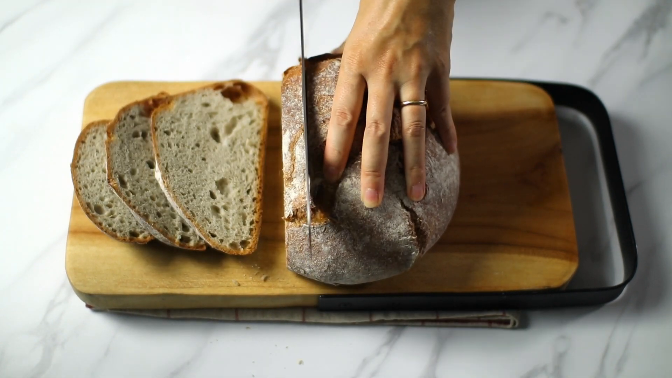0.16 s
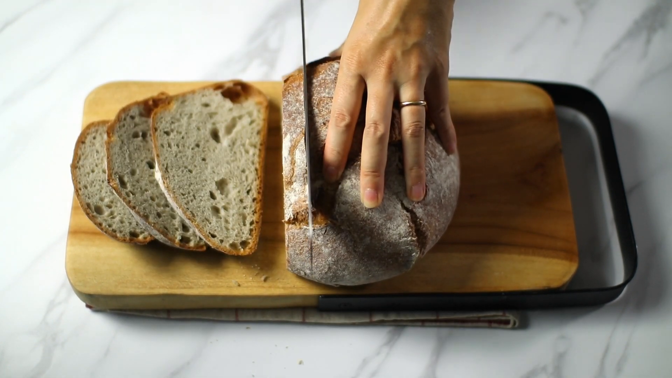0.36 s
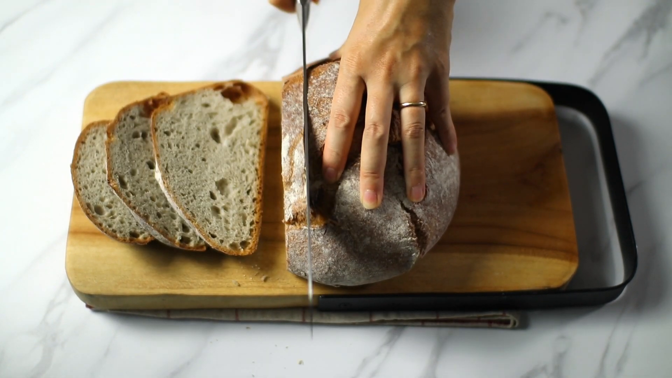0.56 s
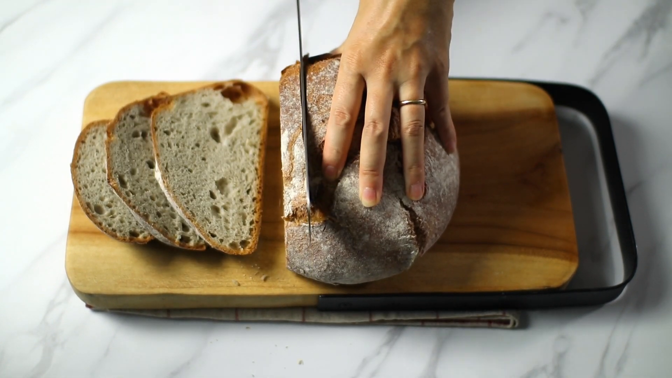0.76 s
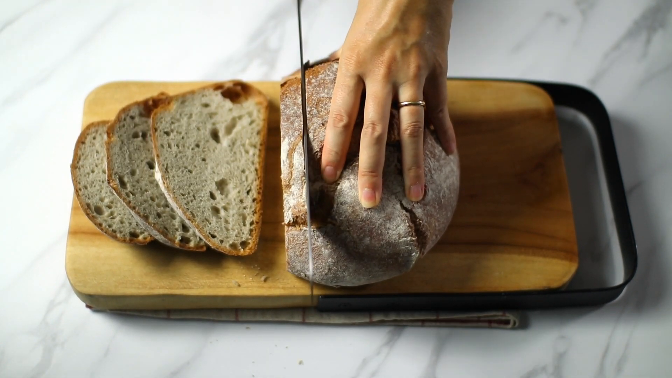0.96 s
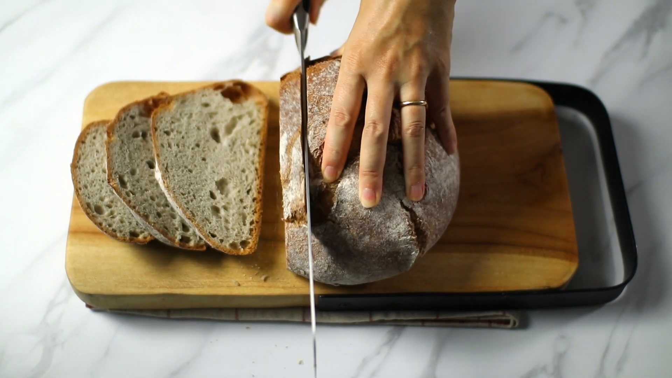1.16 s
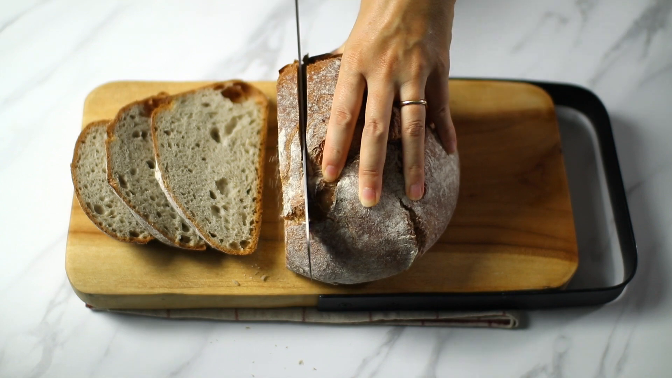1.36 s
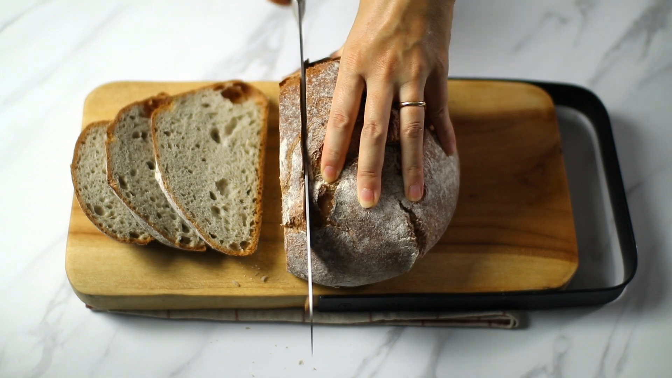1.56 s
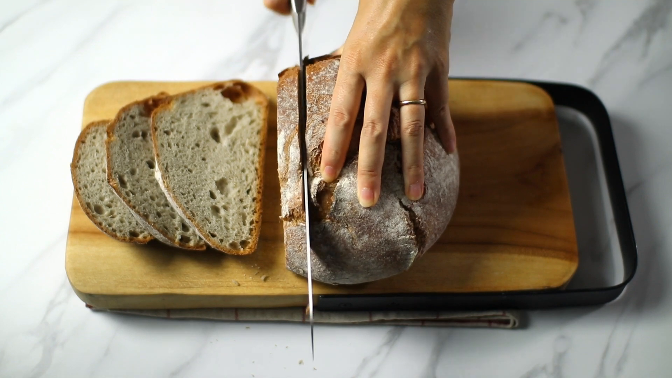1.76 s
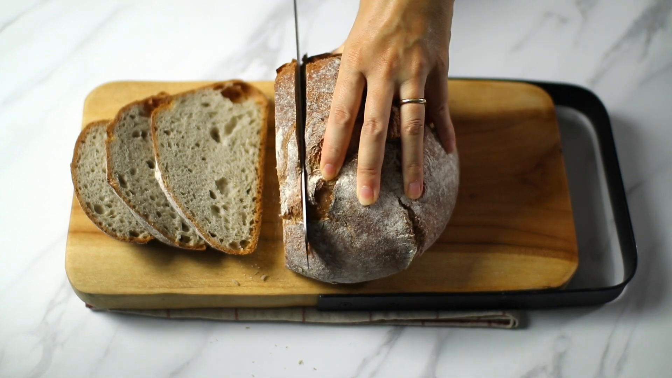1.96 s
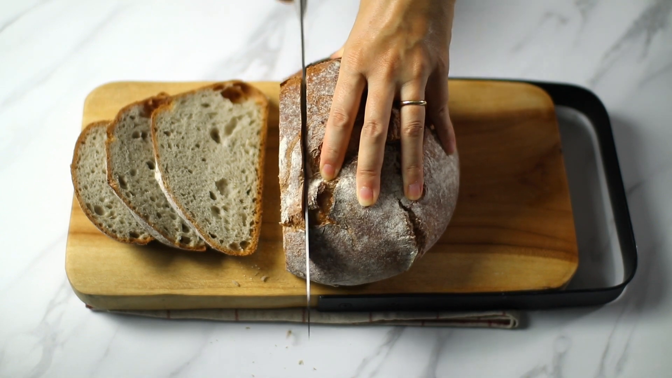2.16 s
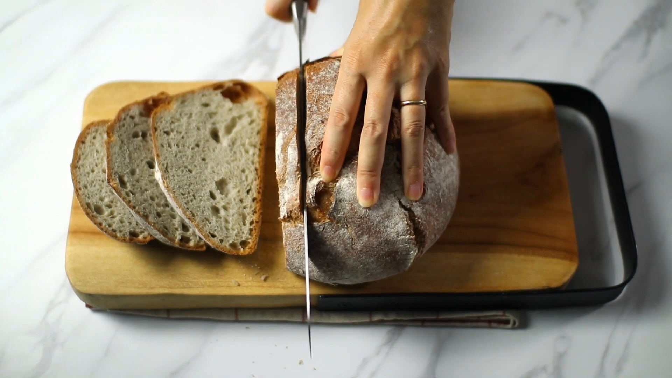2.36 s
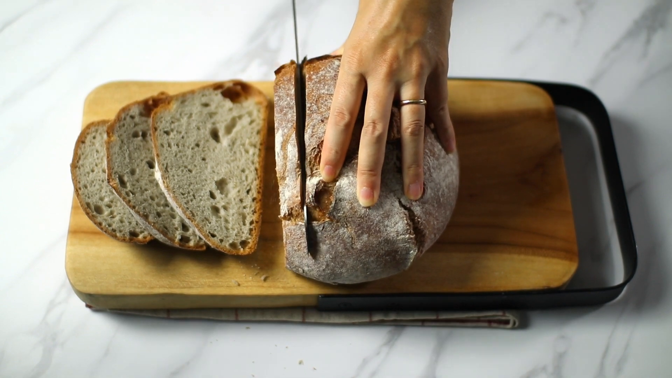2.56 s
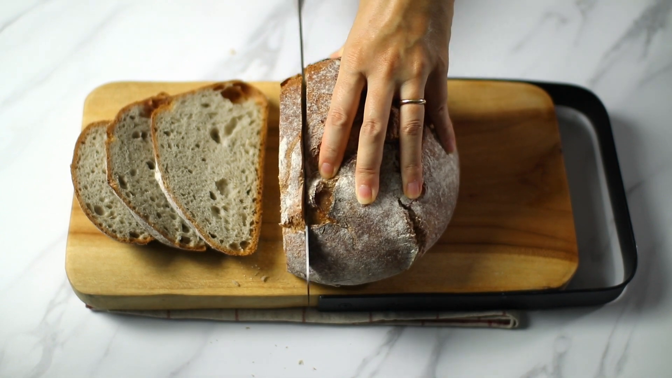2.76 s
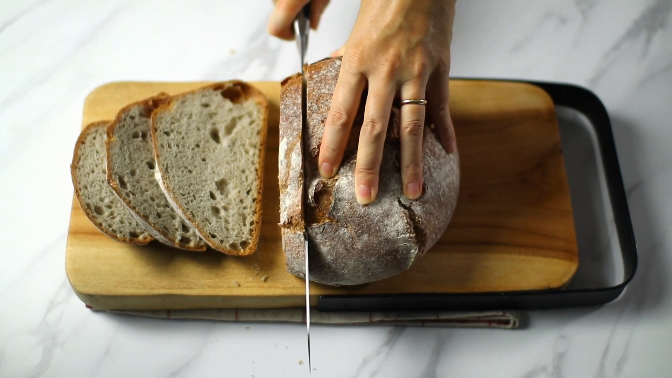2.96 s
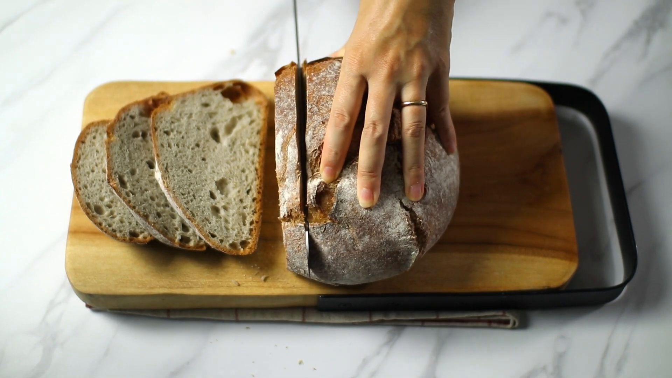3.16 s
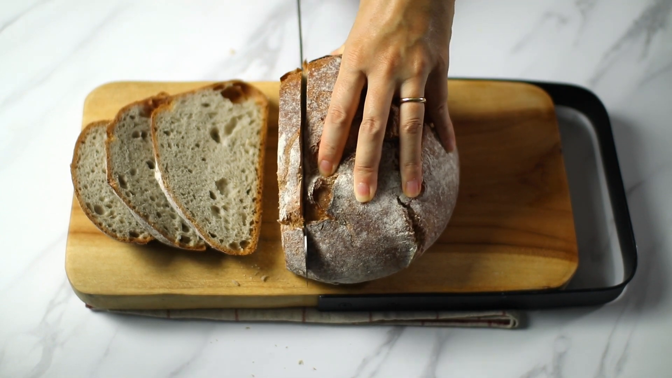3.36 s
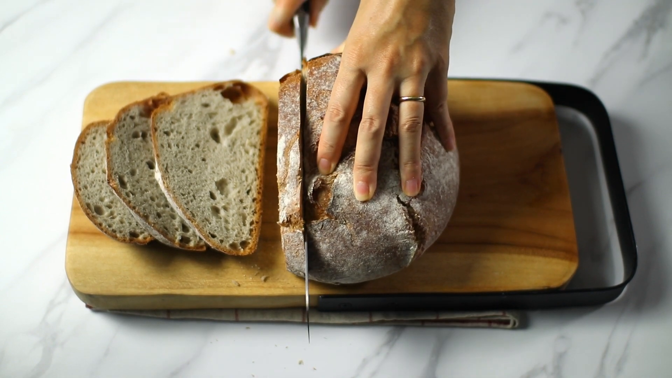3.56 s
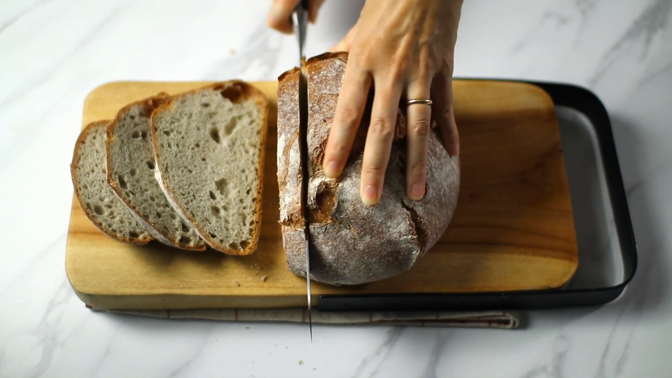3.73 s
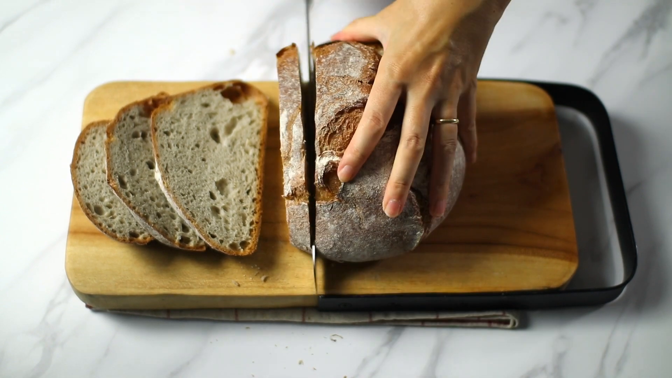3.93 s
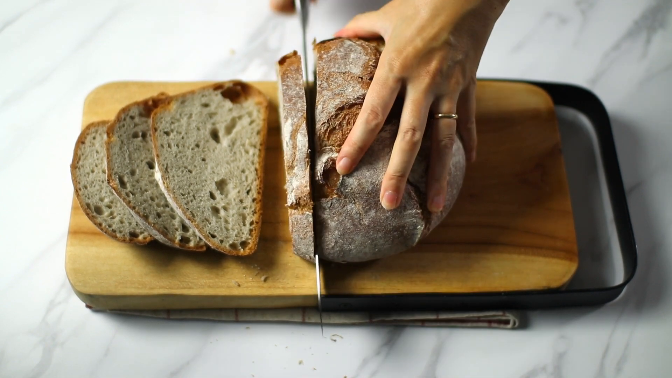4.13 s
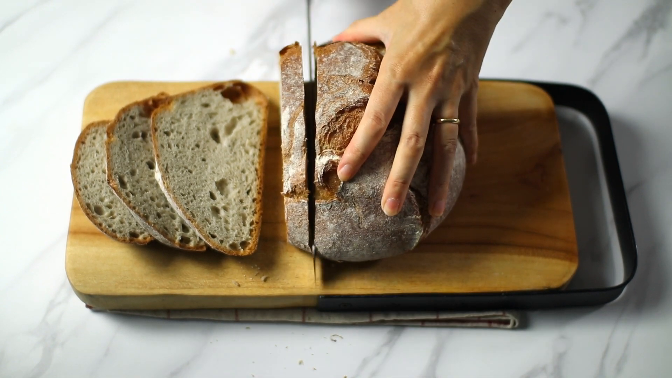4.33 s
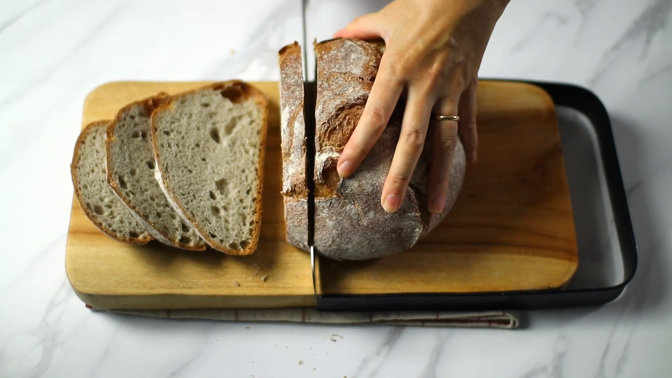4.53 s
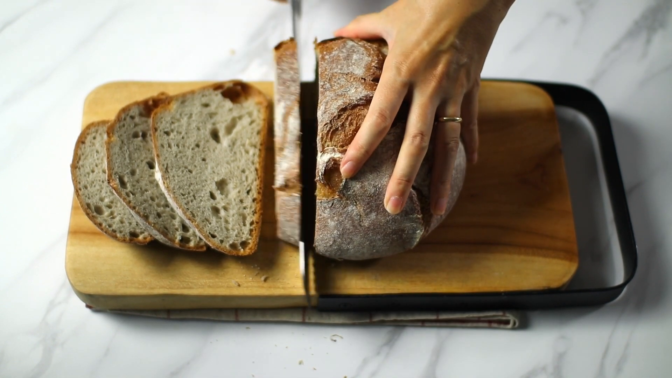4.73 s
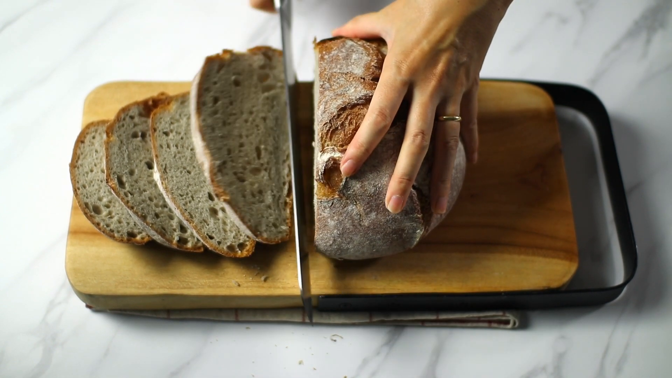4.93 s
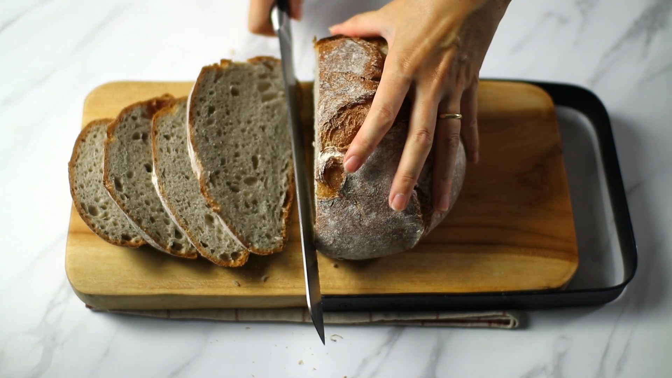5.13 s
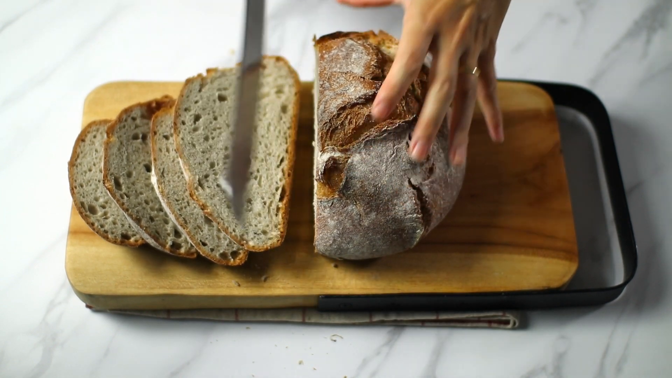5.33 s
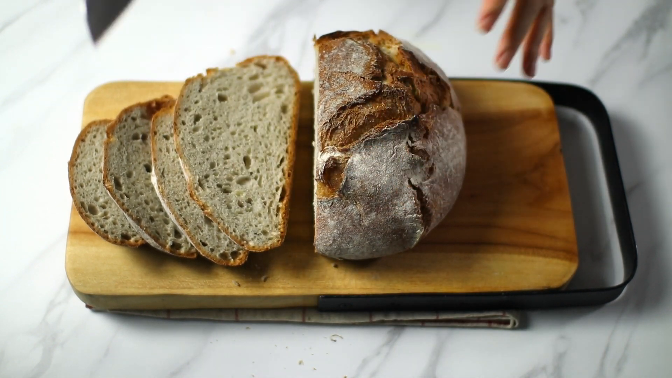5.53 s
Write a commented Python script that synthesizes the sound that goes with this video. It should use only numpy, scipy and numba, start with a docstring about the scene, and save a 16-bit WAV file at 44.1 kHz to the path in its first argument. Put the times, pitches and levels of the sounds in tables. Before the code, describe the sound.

Close, gritty bread sawing with crackling crust and low groans, then teeth rasping on wood and a soft flop in a quiet kitchen.

```python
"""Sawing a crusty loaf

A serrated knife saws a crusty loaf on a wooden board, heard from close by in a quiet kitchen.
Twelve strokes shatter the crust into noise grains and make the loaf shudder and groan by stick-slip;
then the teeth rasp over the board and excite its modes, the blade slides out along the crumb in soft
grains and the slice flops onto the others as damped sines. The steel blade rings along as a modal filter."""
import sys
import numpy as np
from scipy import signal
from scipy.fft import rfft, irfft
from scipy.io import wavfile
from scipy.ndimage import uniform_filter1d
from numba import njit

SR = 44100
rng = np.random.default_rng(int(sys.argv[2]) if len(sys.argv) > 2 else 0)


def transcribe(u):
    """Save the signal u as a 16-bit wav file named by the first command-line argument.

    u: samples, shape (n,) or (channels, n), limited to [-1, 1]; the rate is SR.
    q: integer samples, one column per channel.
    """
    v = np.clip(np.atleast_2d(u).T, -1, 1)
    q = np.round(v * 32767).astype(np.int16)
    wavfile.write(sys.argv[1], SR, q)


N = 246519
T = np.arange(N) / SR
DEEPENS_S = 1.77  # time over which the cut reaches its full depth


def undb(db):
    """Decibel law: level to amplitude gain."""
    return 10 ** (np.asarray(db) / 20)


def unit(x):
    """Normalisation to an rms of 1."""
    return x / np.sqrt(np.mean(x ** 2))


def controls(rows):
    """Linear interpolation: the columns of a curve table, sample by sample."""
    s, *columns = np.transpose(rows)
    return [np.interp(T, np.sort(s), c) for c in columns]


def band(x, lo_hz, hi_hz, order=2):
    """Band-pass filtering (Butterworth)."""
    edges = [lo_hz, min(hi_hz, .45 * SR)]
    return signal.sosfilt(signal.butter(order, edges, "band", fs=SR, output="sos"), x)


def convolve(x, response):
    """Linear superposition: every sample of x launches the impulse response."""
    return signal.fftconvolve(x, response)[:len(x)]


def colour(x, points):
    """Minimum-phase filtering: a causal response with the given (frequency [Hz], level [dB]) curve."""
    hz, db = np.transpose(points)
    log_hz = np.log(np.fft.rfftfreq(8192, 1 / SR) + 1)
    log_gain = np.log(undb(np.interp(log_hz, np.log(hz), db)))
    cepstrum = irfft(log_gain)
    half = len(cepstrum) // 2
    # folding the cepstrum onto positive time makes the response causal
    folded = np.r_[cepstrum[0], 2 * cepstrum[1:half], np.zeros(half)]
    return convolve(x, irfft(np.exp(rfft(folded))))


def fade(t60):
    """Exponential damping: a decay of 60 dB in t60 seconds."""
    return np.exp(-np.log(1000) * T[:SR // 2] / t60)


def burst(t60):
    """Damped noise: a dying puff with energy 1."""
    puff = rng.standard_normal(SR // 2) * fade(t60)
    return puff / np.linalg.norm(puff)


def ring(modes):
    """Modal superposition: impulse response of (frequency [Hz], level [dB], t60 [s]) modes, energy 1."""
    out = np.zeros(SR // 2)
    for k, (hz, db, t60) in enumerate(modes):
        sign = (-1) ** k
        out += sign * undb(db) * fade(t60) * np.sin(2 * np.pi * hz * T[:SR // 2])
    return out / np.linalg.norm(out)


def add(out, s, sound):
    """Superposition: mix a sound in at time s."""
    i = int(s * SR)
    out[i:i + len(sound)] += sound[:N - i]


def walk(rate):
    """Smoothed random modulation: chance with an rms of 1 and about rate new values per second."""
    k = max(int(SR / rate), 2)
    return unit(uniform_filter1d(rng.standard_normal(N)[np.arange(N) // k], k))


def clicks(rate, spread_db):
    """Poisson impulses: random clicks, many small and a few large."""
    size = undb(spread_db * np.minimum(rng.exponential(size=N), 4.5))
    return unit((rng.random(N) < rate / SR) * size * rng.choice([-1, 1], N))


def teeth(rate, jitter, spread_db):
    """Jittered impulse train: serrations catch and let go one after another, unevenly."""
    gaps, sizes = rng.standard_normal((6000, 2)).T
    at = (np.cumsum(np.exp(jitter * gaps)) * SR / rate).astype(int)
    inside = at < N
    return unit(np.bincount(at[inside], undb(spread_db * sizes[inside]), N))


def even(x, seconds):
    """Level regulation: hold the short-term rms near 1, as the hand keeps its force."""
    return x / np.sqrt(uniform_filter1d(x ** 2, int(seconds * SR)) + 1e-9)


@njit
def resonate(x, hz, width):
    """Time-varying resonance: a state-variable band-pass with a moving centre."""
    y, b, l = np.empty(len(x)), 0., 0.
    for i in range(len(x)):
        g, k = np.tan(np.pi * hz[i] / SR), width / hz[i]
        v = (b + g * (x[i] - l)) / (1 + g * (g + k))
        b, l, y[i] = 2 * v - b, l + 2 * g * v, k * v
    return y


def voiced(x, lo_hz, hi_hz):
    """Zero-phase band splitting: low, middle and high parts of rms 1 that stay in phase."""
    low = signal.sosfiltfilt(signal.butter(3, lo_hz, fs=SR, output="sos"), x)
    below = signal.sosfiltfilt(signal.butter(3, hi_hz, fs=SR, output="sos"), x)
    return unit(low), unit(below - low), unit(x - below)


def fractures(rate, spread_db, t60, count=6):
    """Brittle fracture: tiny breaks in several flakes, each flake with its own brief rattle."""
    return unit(sum(convolve(clicks(rate / count, spread_db), burst(t60)) for _ in range(count)))


def scatter(x):
    """Sign randomisation: the same jolts, each pushing a different way."""
    return x * rng.choice([-1, 1], N)


def swing(s, length, power=1, growth_db=0):
    """Half-sine kinematics: one swing of the arm, with pressure growing steadily along it."""
    way = np.clip((T - s) / length, 0, 1)
    return np.abs(np.sin(np.pi * way)) ** power * undb(growth_db * (way - .5))


def held(s, length, attack, t60):
    """Contact envelope: linear attack, hold, and a decay of 60 dB in t60 seconds."""
    release = np.maximum(T - s - length, 0)
    return np.clip((T - s) / attack, 0, 1) * np.exp(-np.log(1000) * release / t60)


# saw strokes: (time [s], length [s], growth of pressure from start to end [dB], crunch [dB], fizz [dB],
#   bite into the crust [dB], loaf shake [dB], sway in that shake [dB], board rocking [dB],
#   crust shell [dB], hollow of the cut [Hz], hollow [dB])
STROKES = [ (0.065, 0.2, -4.5, -37, -41, -36.5, -37, 1.5, -33, -4, 630, -0.5),
           (0.316, 0.21, 0.5, -38.5, -44, -37, -31, -0.5, -37.5, 0, 620, -4),
           (0.624, 0.18, 0.5, -43, -45.5, -40.5, -37.5, 2, -39.5, 0, 600, -6),
           (0.858, 0.278, 10.5, -36, -45.5, -37.5, -32, -3, -34, 1.5, 570, -9),
           (1.197, 0.22, 0, -42, -46, -37, -34.5, 2.5, -37.5, -2, 497, 3),
           (1.457, 0.23, 3, -41, -50.5, -36, -33, -7, -37.5, -4, 467, 0),
           (1.763, 0.22, 7, -42, -49, -37, -36, -1.5, -37, -4, 405, 1.5),
           (2.039, 0.270, 9.5, -39, -49, -37.5, -33.5, -4, -41.5, -16, 462, -1.5),
           (2.396, 0.21, 0.5, -41.5, -48.5, -40, -40, 1, -39, -24, 600, -27),
           (2.623, 0.34, 15.5, -37.5, -47.5, -37, -34.5, -1.5, -38.5, -17, 586, -18),
           (3.056, 0.2, 7, -40.5, -47, -39.5, -44.5, -0.5, -46, -5, 1034, 1.5),
           (3.327, 0.27, 0.5, -38, -49.5, -36.5, -36, -1.5, -38, -26, 1250, -19)]
# between strokes the blade turns round in the loaf, until it is through;
# the turns get quieter as it sinks into soft crumb
REST_SINKS_DB_PER_S = -1.7
THROUGH_S, THROUGH_T60_S = 3.595, 0.68


def stroked(stroke_db, law, rest_db):
    """Energy summation: gain of one layer over all strokes, never quite still while the blade is in the loaf."""
    power, extra_db, overhang, lag = law
    after = np.maximum(T - THROUGH_S, 0)
    energy = undb(rest_db + REST_SINKS_DB_PER_S * T - 60 * after / THROUGH_T60_S) ** 2
    for (s, length, growth_db, *_), db in zip(STROKES, stroke_db):
        arm = swing(s + lag - overhang, length + 2 * overhang, power, growth_db + extra_db)
        energy += (undb(db) * arm) ** 2
    return np.sqrt(energy)


# the hand leans on the loaf to finish the cut:
# (time [s], length [s], board rocking [dB], loaf shake [dB])
LEANS = [(3.781, 0.073, -46, -66), (3.889, 0.13, -30.5, -45.5), (4.0, .09, -43, -62),
         (4.075, 0.17, -30, -45), (4.163, .42, -42.5, -41), (4.84, .08, -61.5, -81)]


def leaned(column, power=1):
    """Amplitude summation: gain of one LEANS level column over all leans."""
    return sum(undb(row[column]) * swing(row[0], row[1], power) for row in LEANS)


# spectrum of the kitchen's hush: (frequency [Hz], relative level [dB])
KITCHEN = [(15, -33), (25, 9), (126, -35), (691, -36.5), (857, -27), (1040, -26.5), (1470, -21.5),
           (2810, -26), (3490, -24), (4330, -27.5), (13400, -39.5), (15800, -51)]
KITCHEN_DB = -64.5


def kitchen_hush():
    """Stationary coloured noise: the room's steady background."""
    return undb(KITCHEN_DB) * unit(colour(rng.standard_normal(N), KITCHEN))


def kitchen_echo(close):
    """Diffuse reverberation: a delayed, decaying noise tail as the room's impulse response."""
    tail = np.r_[np.zeros(SR // 150), burst(t60=.33)]
    return undb(-15) * convolve(band(close, 320, 7300, order=2), tail)


# rumble of board and tray: (frequency [Hz], relative level [dB])
TRAY = [(20, -2), (35, -23.5), (55, 8.5), (75, 0.5), (105, -7.5), (140, -18), (200, -55)]
# laws: (power of the speed, extra growth over the stroke [dB], overhang at both ends [s], lag [s])
ROCK_LAW, REST_ROCK_DB = (1.5, -11.5, 0.0352, 0.09), -51.5


def rocking():
    """Forced low-frequency vibration: board and tray rumble on the cloth under the arm's push."""
    *_, rock_db, _, _, _ = np.transpose(STROKES)
    push = stroked(rock_db, ROCK_LAW, REST_ROCK_DB) + leaned(column=2, power=1.5)
    return push * even(colour(rng.standard_normal(N), TRAY), seconds=0.077)


# the slice lands: (time [s], level before contact and decay [dB], frequency [Hz], t60 [s])
FLOP = [(5.2303, -38.5, 71, 0.061), (5.2368, -28.5, 708, 0.016), (5.242, -28.5, 54.4, 0.14)]


def flop():
    """Soft impact of damped oscillators: the slice taps its neighbour, thuds and sheds a few crumbs."""
    out, t = np.zeros(N), T[:SR // 2]
    for s, db, hz, t60 in FLOP:
        soft_contact = 1 - np.exp(-5 * hz * t)
        add(out, s, -undb(db) * soft_contact * fade(t60) * np.sin(2 * np.pi * hz * t))
    crumbs = band(burst(t60=0.072), 550, 2900, order=2)
    add(out, 5.243, undb(-15) * crumbs)
    return out


# spectrum of the crumb grains: (frequency [Hz], relative level [dB])
CRUMB = [(200, -18), (380, -12), (560, -2), (1100, 3), (1600, -1.5), (2500, 0), (3600, -7), (5000, -13.5),
         (8000, -20.5), (11700, -30), (15800, -38)]
# the blade's flat rubs the crumb: (time [s], length [s], level [dB], brightness [dB])
RUBS = [(3.735, 0.083, -54.5, -1.5), (3.837, 0.068, -43, -14), (3.907, 0.09, -41, -14.5),
        (4.032, .072, -42.5, -12), (4.222, 0.059, -39, -15), (4.71, 0.061, -45, -16.5),
        (4.792, 0.099, -53.5, -21), (4.912, 0.37, -65, -10), (5.058, 0.077, -54.5, -20)]
RUB_ATTACK_S, RUB_T60_S = 0.017, 0.11


def rubbing():
    """Granular friction: the flat of the blade brushes crumb and loose grit in fine, soft grains."""
    grains = colour(fractures(rate=8200, spread_db=2.5, t60=0.0071), CRUMB)
    low, middle, high = voiced(band(grains, 430, 17000, order=3), lo_hz=950, hi_hz=6500)
    out = np.zeros(N)
    for s, length, db, bright_db in RUBS:
        grain = undb(-7.5) * low + middle + undb(bright_db) * high
        out += held(s, length, RUB_ATTACK_S, RUB_T60_S) * undb(db) * grain
    return out


# modes of the wooden board: (frequency [Hz], relative level [dB], t60 [s])
BOARD = [(239, -3.5, 0.042), (282, -7, 0.067), (327, -12, 0.048), (435, -5.5, 0.076), (497, -6.5, 0.082),
         (567, -4.5, 0.051), (840, -13.5, 0.094), (970, -6, 0.075), (1021, -0.5, 0.056), (1085, 3, 0.1),
         (1158, 0, 0.085), (1230, -3.5, 0.037), (1414, -5.5, 0.13), (1466, -5.5, 0.043), (1607, -14, .07),
         (1795, -17.5, 0.082), (1870, -15, 0.036), (2080, -17.5, 0.097), (2254, -11, 0.084),
         (2424, -16.5, 0.056), (2925, -22, 0.034), (3440, -24, 0.0487)]
# spectrum of the grit: (frequency [Hz], relative level [dB])
RASP = [(700, -17), (1500, 2), (2300, -7), (2750, -7.5), (3600, -4.5), (4000, -14), (4400, -10.5),
        (5600, -19.5), (7000, -18.5), (8500, -26.5), (11800, -23.5), (13300, -20), (15500, -31)]
# the teeth drag over the board:
# (time [s], length [s], attack [s], level [dB], brightness [dB], pressure on the wood [dB])
SCRAPES = [(4.112, 0.055, .007, -26.5, -8.5, -10), (4.29, 0.1, .035, -22, -7.5, -10),
           (4.395, 0.0076, 0.0091, -30, -19.5, 2.5), (4.457, 0.03, .02, -39, -7, 1.5),
           (4.49, 0.1, 0.0048, -28, -12, -11), (4.664, 0.04, 0.016, -43.5, -10.5, -8.5)]
SCRAPE_T60_S, THRUM_T60_S = .16, 0.28
# single teeth bite into the wood: (time [s], force as peak level [dB])
BITES = [(4.121, -21), (4.134, -14.5), (4.149, -18), (4.171, -17.5), (4.295, -22), (4.337, -14),
         (4.379, -14.5), (4.4, -13), (4.496, -21.5)]


def scraping():
    """Modal excitation by friction: teeth stutter over the wood and ring the board; grit rasps under them."""
    slips = teeth(rate=190, jitter=.5, spread_db=1.5) + undb(-1) * clicks(rate=2500, spread_db=1.5)
    # the board's crowded weaker modes fill in between the strong ones
    board = ring(BOARD) + undb(0.5) * band(burst(t60=0.037), 300, 1750)
    wood, tone, _ = voiced(convolve(slips, board), lo_hz=720, hi_hz=5900)
    agitation = 1 + unit(convolve(np.abs(slips), fade(t60=0.016)))
    grit = fractures(rate=6000, spread_db=2.5, t60=0.0076) * agitation
    rasp = even(colour(grit, RASP), seconds=0.035)
    thrum = even(wood + undb(-8.0) * unit(band(slips, 110, 500)), seconds=0.065)
    tone = even(tone, seconds=0.041)
    out = np.zeros(N)
    for s, length, attack, db, bright_db, pressure_db in SCRAPES:
        out += undb(db) * held(s, length, attack, SCRAPE_T60_S) * (tone + undb(bright_db) * rasp)
        out += undb(db + pressure_db) * held(s, length, attack, THRUM_T60_S) * thrum
    for s, force_db in BITES:
        knock = convolve(burst(t60=0.0044), board) * fade(t60=0.11)
        add(out, s, undb(force_db) * knock / np.abs(knock).max())
    return out


# modes of the steel blade: (frequency [Hz], relative level [dB], t60 [s])
BLADE = [(2740, -2.5, 0.37), (3430, -7.5, .12), (3770, -8, .08), (4310, -2.5, 0.13), (4620, -7, .06),
         (5200, -7, 0.061), (6420, -3.5, 0.055), (6980, 1.5, 0.051), (7840, -5, 0.15), (8780, -4, .07),
         (9830, -9, 0.13), (10740, -6, 0.045), (11500, -1.5, .05), (11780, -10, .11), (13000, -6.5, 0.076),
         (13850, -10.5, .09), (14280, -9.5, .09), (14900, -15.5, .06)]


def steel(contact):
    """Modal resonance: the blade rings on after the treble of whatever its teeth touch."""
    return convolve(scatter(band(contact, 2600, 13000)), ring(BLADE))


BLADE_DB = (-13, -18.5)  # gain of the ringing: at first, buried in the loaf


def blade_ringing(bread, wood):
    """Contact damping: the loaf damps the blade; free of it, on hard wood, the steel rings more."""
    buried = undb(np.interp(T, [0, DEEPENS_S], BLADE_DB))
    return buried * steel(bread) + undb(-7.5) * steel(wood)


# the largest flakes of crust snap: (time [s], tick peak [dB], knock peak [dB])
CRACKS = [(0.0843, -25, -50), (0.0941, -31, -31), (0.1044, -22, -20), (0.1408, -31, -28),
          (0.1591, -26, -14), (0.1724, -31, -22.5), (0.3383, -29, -41), (0.641, -37, -32.5),
          (0.8718, -42, -37), (1.0224, -19.5, -39), (1.0414, -27, -38), (1.0613, -23, -19.5),
          (1.0813, -29, -20), (1.483, -34, -26), (1.5933, -23.5, -19.5), (2.101, -31, -33),
          (2.1448, -22, -43), (2.2193, -27, -28), (2.4219, -40, -31), (2.6627, -32, -30.5),
          (2.6847, -29, -39), (2.7231, -30, -19.5), (2.7523, -36, -24.5), (3.0317, -41, -40),
          (3.187, -20, -47.5), (3.3418, -30, -30), (3.802, -36, -36)]
# the blade is jolted and pings: (time [s], peak [dB])
PINGS = [(0.188, -22.5), (0.2058, -17), (0.219, -22), (4.5812, -28), (5.2435, -53)]


def snaps():
    """Impulsive fracture: larger flakes break with a sharp tick and a dull knock; jolts ping the blade."""
    out = np.zeros(N)
    # each sound starts about a millisecond after its table time
    for s, db, body_db in CRACKS:
        tick = band(burst(t60=0.0057), 1500, 9700, order=2)
        knock = band(fade(t60=0.00018) * 0.24 + burst(t60=0.013), 220, 1070)
        add(out, s + .001, undb(db) * tick / np.abs(tick).max())
        add(out, s + 0.00071, undb(body_db) * knock / np.abs(knock).max())
    for s, db in PINGS:
        ringing = convolve(burst(t60=0.038), ring(BLADE))
        ping = ringing * undb(-10.5) + band(burst(t60=0.017), 1500, 13600)
        add(out, s + 0.0015, undb(db) * ping / np.abs(ping).max())
    return out


# the blade sticks and slips in the loaf:
# (time [s], length [s], pitch [Hz], glide [Hz per s], level [dB])
GROANS = [(1.02, 0.085, 283, -700, -30), (1.252, .11, 233.8, 98, -35), (1.522, .11, 228, -130, -27.5),
          (1.682, 0.045, 209, -100, -39.5), (1.783, 0.064, 211.5, -50, -39),
          (1.872, 0.085, 217.8, -280, -32.5), (2.138, 0.09, 198, 150, -33),
          (2.205, 0.061, 234.5, -250, -31), (2.592, 0.1, 216, -100, -44.5)]
GROAN_ATTACK_S, GROAN_T60_S = 0.021, 0.19
SHAKE_LAW, REST_SHAKE_DB = (1.83, 9.5, 0.0375, -0.014), -50
SHUDDER_HZ = 218.5
SWAY_HZ = (143.5, 132)  # the loosened loaf sways slower: at first, at full depth


def loaf(catches):
    """Stick-slip and forced resonance: tugs of the teeth shudder the loaf; where the blade grips, it groans."""
    starts, lengths, _, _, _, _, shake_db, sway_db, *_ = np.transpose(STROKES)
    shake = stroked(shake_db, SHAKE_LAW, REST_SHAKE_DB) + leaned(column=3)
    tugs = np.diff(catches, prepend=0)
    shudder = even(resonate(band(tugs, 117, 360), np.full(N, SHUDDER_HZ), 40.0), seconds=0.061)
    sway_hz = np.interp(T, [0, DEEPENS_S], SWAY_HZ)
    sway = even(resonate(band(tugs, 101, 185), sway_hz, 42.0), seconds=.035)
    sway_gain = undb(np.interp(T, starts + lengths / 2, sway_db))
    out = shake * even(shudder + sway_gain * sway, seconds=0.045)
    waver = 1 + 0.026 * walk(rate=90)
    flutter = unit(undb(3.0 * walk(rate=130)))
    for s, length, hz, glide, db in GROANS:
        pitch = (hz + glide * np.clip(T - s, 0, length)) * waver
        tone = unit(np.sin(2 * np.pi * np.cumsum(pitch) / SR))
        out += undb(db) * held(s, length, GROAN_ATTACK_S, GROAN_T60_S) * flutter * tone
    return out


# spectrum of the breaking crust: (frequency [Hz], relative level [dB])
CRUST = [(300, -3.5), (450, 4.5), (700, 4.5), (1100, 1.5), (1900, -6), (2450, -11.5), (3000, -12),
         (3900, -15.5), (5000, -20.5), (7200, -23.5), (9600, -34), (11600, -29), (15500, -38)]
# how each layer follows the arm, columns as in ROCK_LAW, and its level during the turns [dB]
CRUNCH_LAW, REST_CRUNCH_DB = (1.07, 0, 0.0028, 0.0043), -58.5
FIZZ_LAW, REST_FIZZ_DB = (1.27, -11.5, 0.0082, .003), -65.5
BITE_LAW, REST_BITE_DB = (0.89, 1, .003, .002), -52.5
SHELL_HZ = (2840, 3590)  # the crust's shell rings higher as the cut deepens: at first, at full depth
UNEVEN_DB = 0.78  # the crust is now harder, now softer


def sawing():
    """Fracture exciting resonators: each tooth sets off breaks that ring the crust's shell and the cut's hollow."""
    _, _, _, crunch_db, fizz_db, bite_db, *_ = np.transpose(STROKES)
    mid_stroke = [(s + length / 2, *row[-3:]) for s, length, *row in STROKES]
    shell_db, hollow_hz, hollow_db = controls(mid_stroke)
    shell_hz = np.interp(T, [0, DEEPENS_S], SHELL_HZ)
    catches = teeth(rate=200, jitter=.5, spread_db=2.5)
    flurry = unit(convolve(catches, fade(t60=0.031)))
    # sparse larger breaks stand out of the dense fine ones
    pops = unit(band(fractures(rate=110, spread_db=2.5, t60=0.0036), 850, 7700, order=1))
    fine = unit(fractures(rate=4200, spread_db=0.0, t60=0.0054) * (2 + flurry))
    breaks = even(fine + undb(-12.0) * pops, seconds=0.024)
    bite, crunch, fizz = voiced(colour(breaks, CRUST), lo_hz=1720, hi_hz=5860)
    crunch = crunch + undb(shell_db) * unit(resonate(scatter(breaks), shell_hz, 620.0))
    bite = bite + undb(hollow_db) * unit(resonate(scatter(breaks), hollow_hz, 75.0))
    crust = (stroked(crunch_db, CRUNCH_LAW, REST_CRUNCH_DB) * even(crunch, seconds=0.044)
             + stroked(fizz_db, FIZZ_LAW, REST_FIZZ_DB) * fizz
             + stroked(bite_db, BITE_LAW, REST_BITE_DB) * even(bite, seconds=0.11))
    return (crust + loaf(catches)) * undb(UNEVEN_DB * walk(rate=36))


def scene():
    """Superposition of all sources, the ringing blade, a faint kitchen echo and the room's hush."""
    crust, wood, crumb = sawing(), scraping(), rubbing()
    blade = blade_ringing(crust + crumb, wood)
    close = crust + wood + crumb + blade + snaps() + flop()
    return (close + rocking() + kitchen_echo(close) + kitchen_hush())[None]


TOP_HZ = 15850


def record(dry):
    """Soft saturation and low-pass filtering: round the loudest peaks and cut the top."""
    ceiling = undb(-5.5)
    rounded = ceiling * np.tanh(dry / ceiling)
    return signal.sosfilt(signal.ellip(10, .2, 80, TOP_HZ, fs=SR, output="sos"), rounded)


dry = scene()
out = record(dry)
transcribe(out)
```